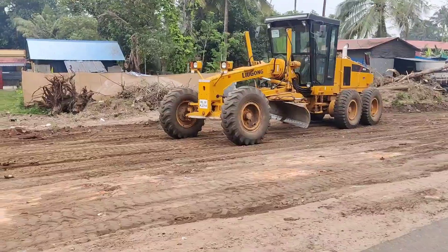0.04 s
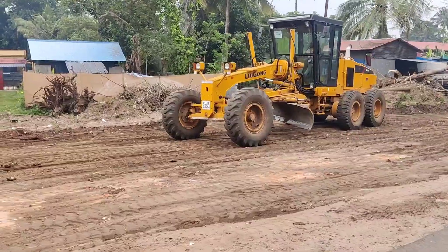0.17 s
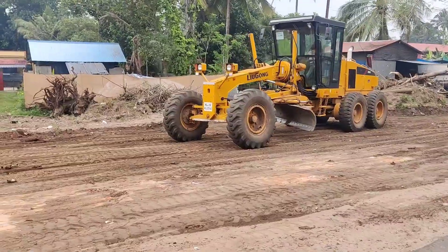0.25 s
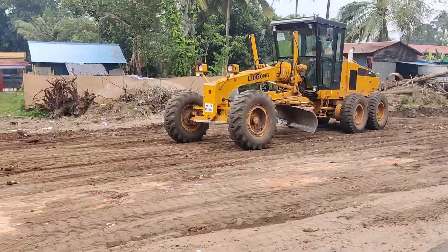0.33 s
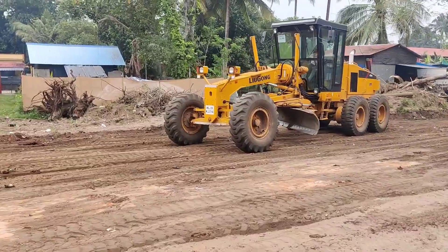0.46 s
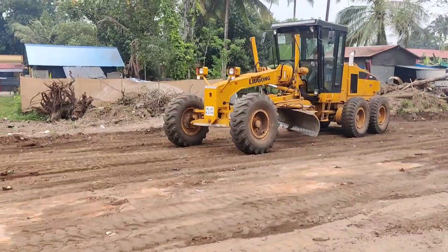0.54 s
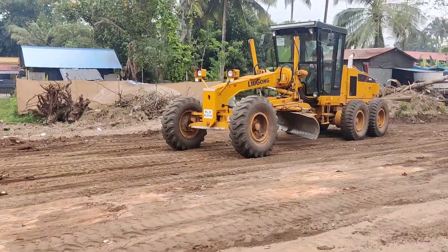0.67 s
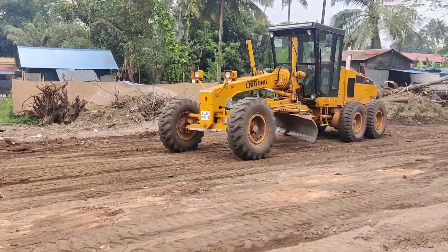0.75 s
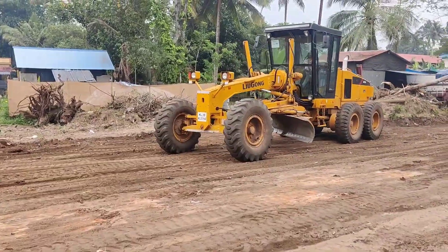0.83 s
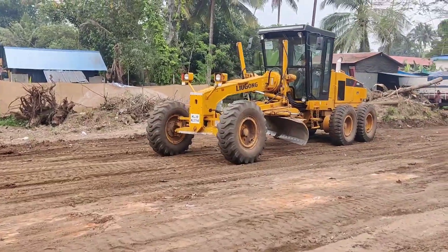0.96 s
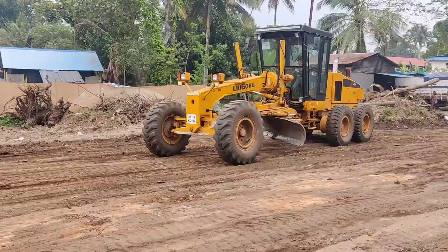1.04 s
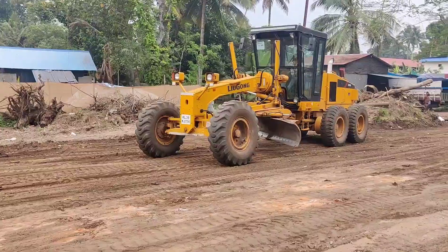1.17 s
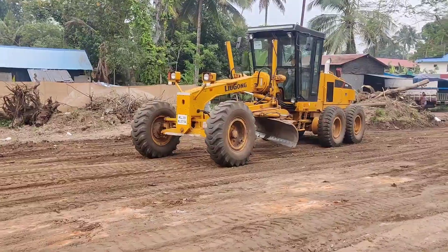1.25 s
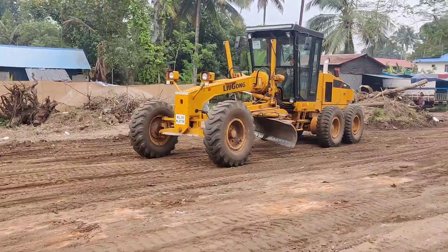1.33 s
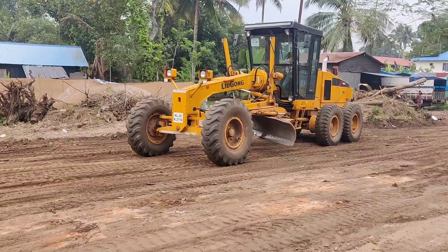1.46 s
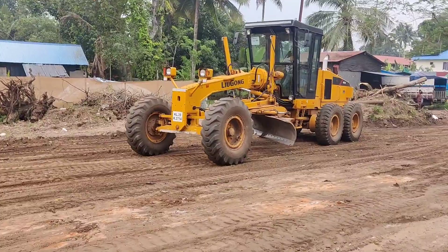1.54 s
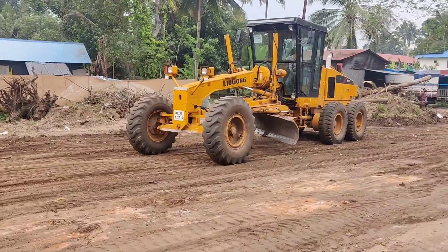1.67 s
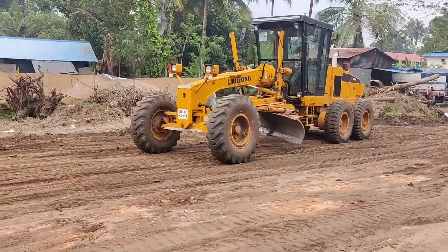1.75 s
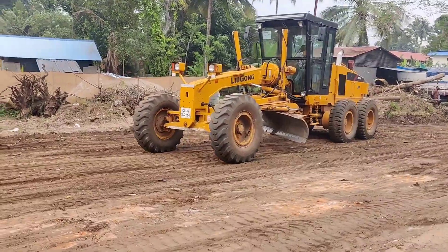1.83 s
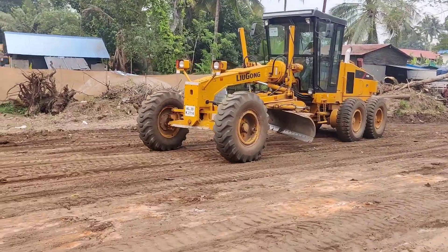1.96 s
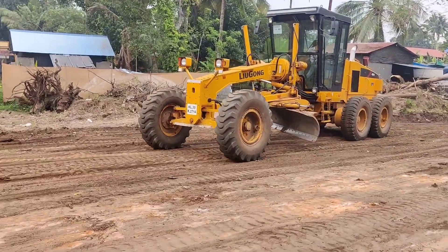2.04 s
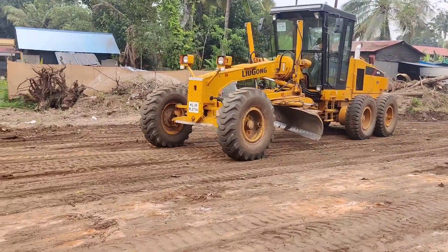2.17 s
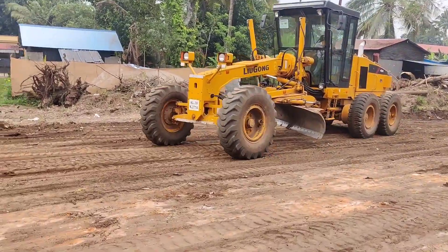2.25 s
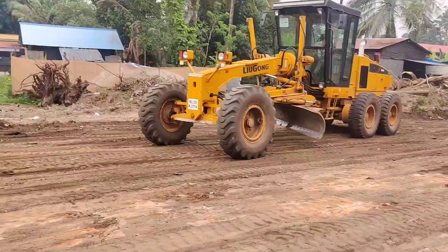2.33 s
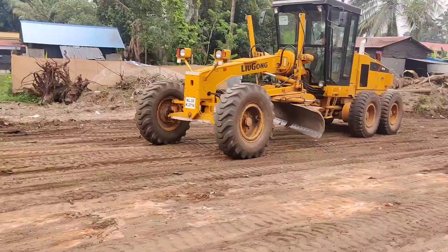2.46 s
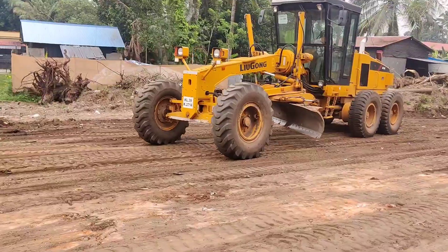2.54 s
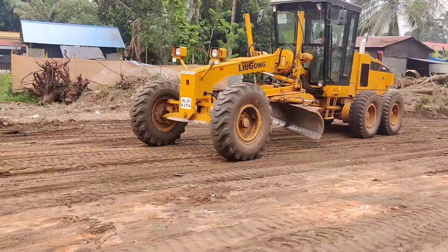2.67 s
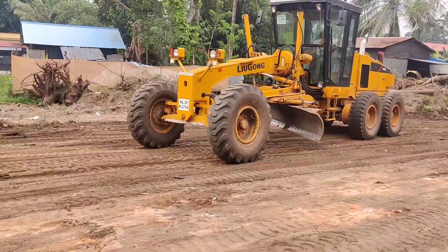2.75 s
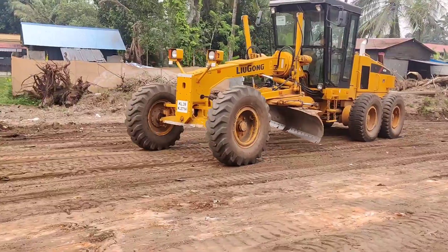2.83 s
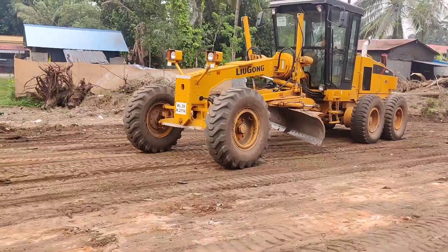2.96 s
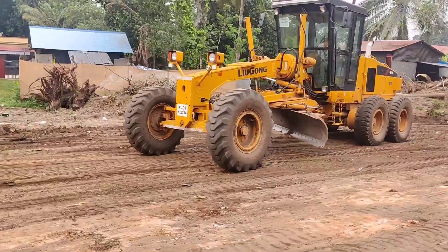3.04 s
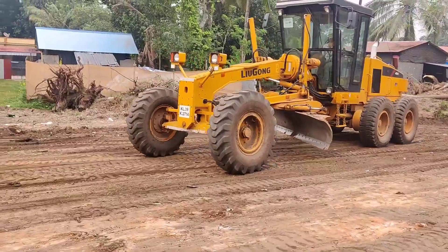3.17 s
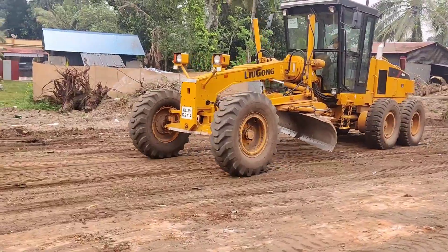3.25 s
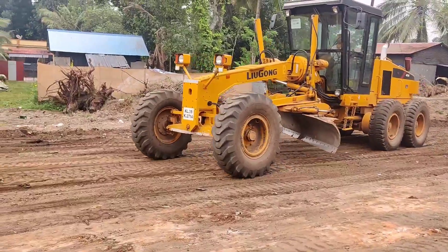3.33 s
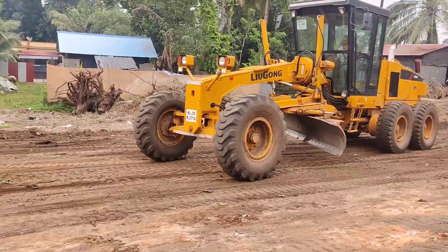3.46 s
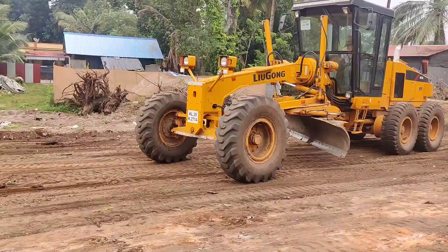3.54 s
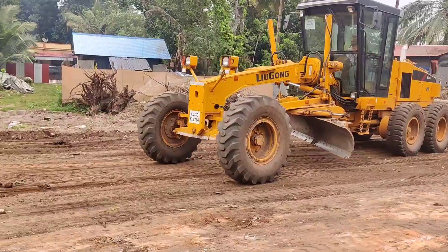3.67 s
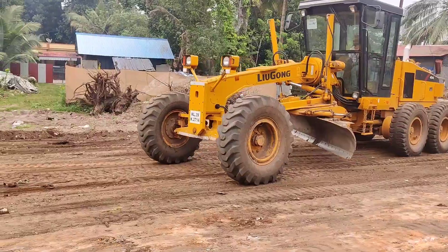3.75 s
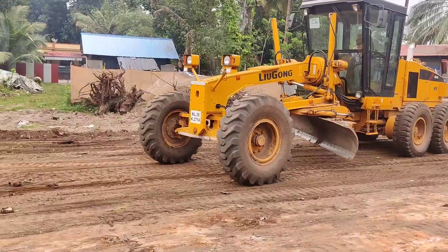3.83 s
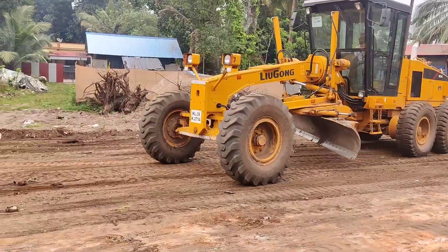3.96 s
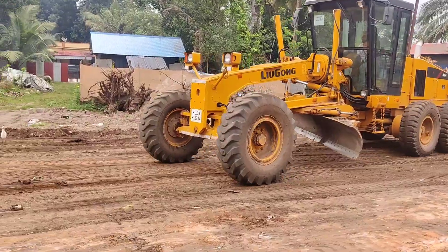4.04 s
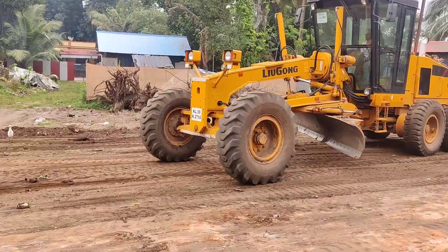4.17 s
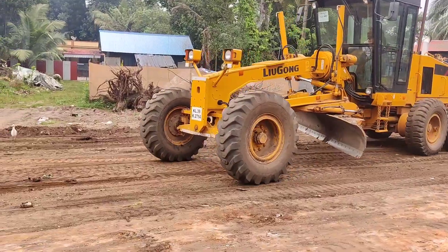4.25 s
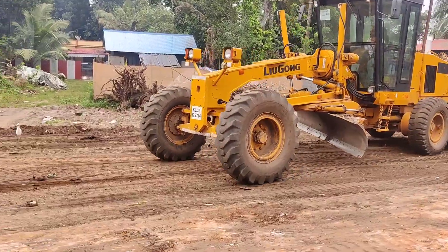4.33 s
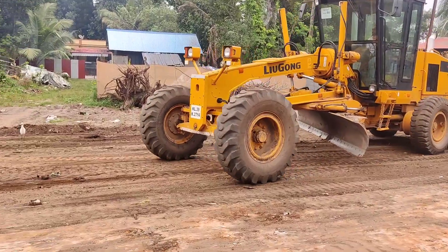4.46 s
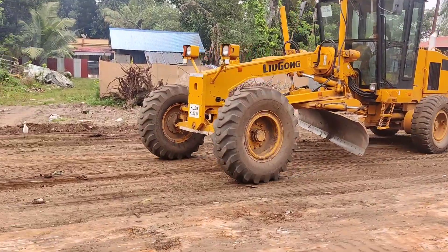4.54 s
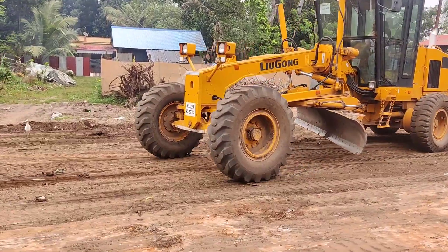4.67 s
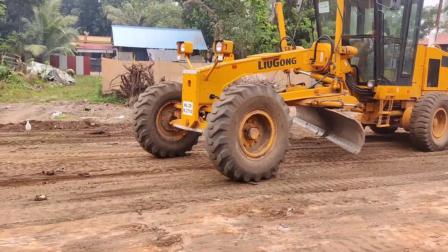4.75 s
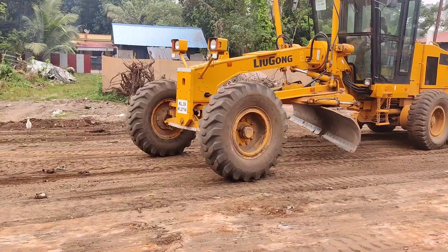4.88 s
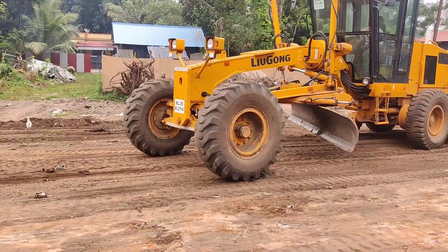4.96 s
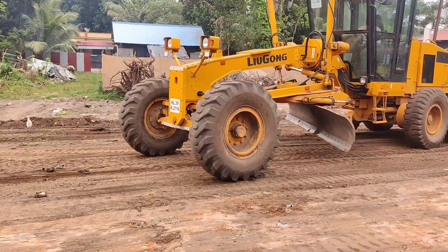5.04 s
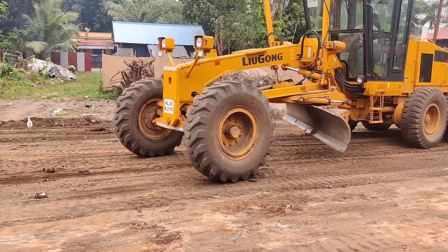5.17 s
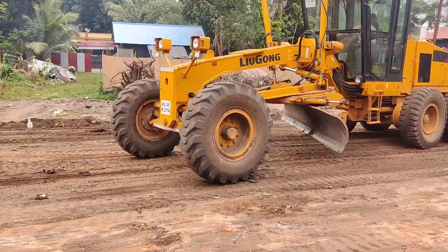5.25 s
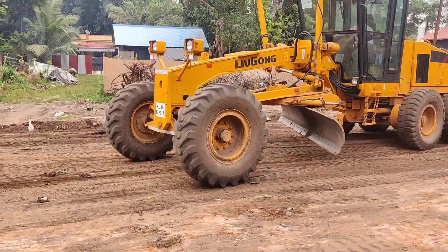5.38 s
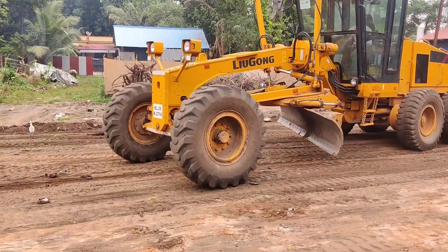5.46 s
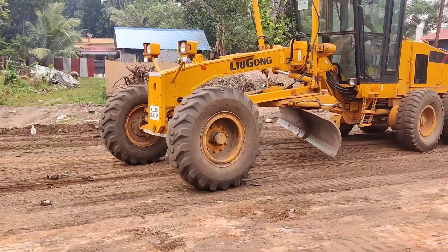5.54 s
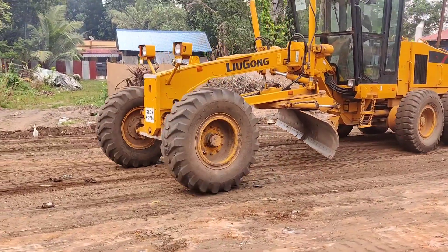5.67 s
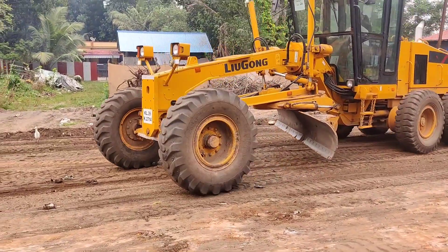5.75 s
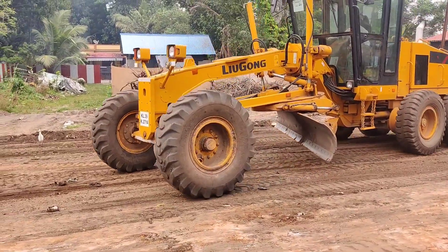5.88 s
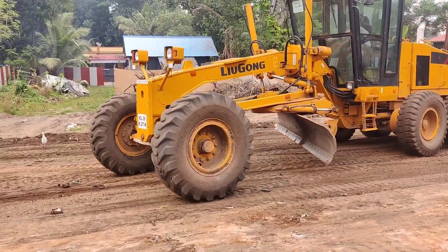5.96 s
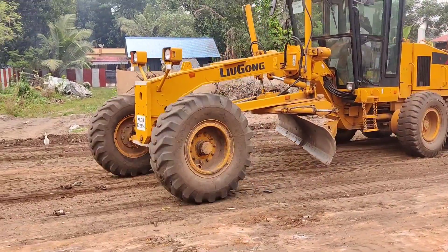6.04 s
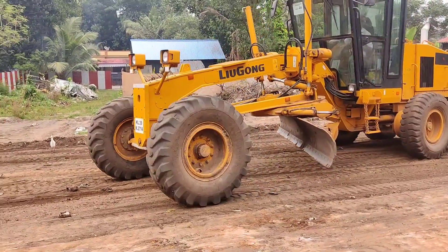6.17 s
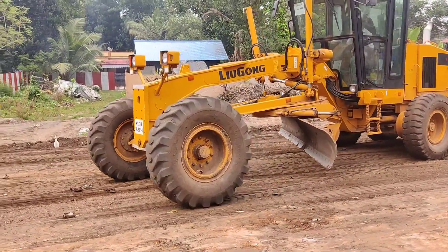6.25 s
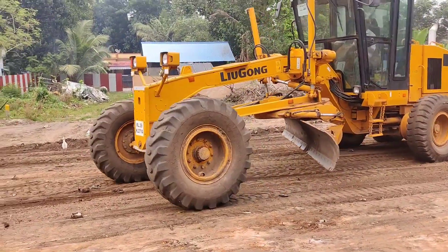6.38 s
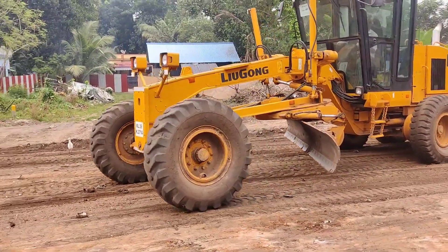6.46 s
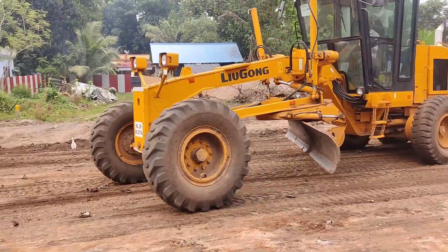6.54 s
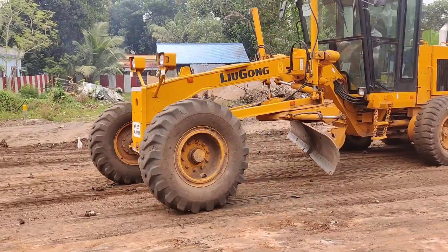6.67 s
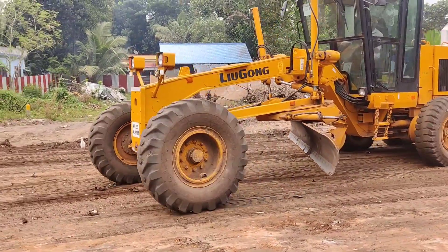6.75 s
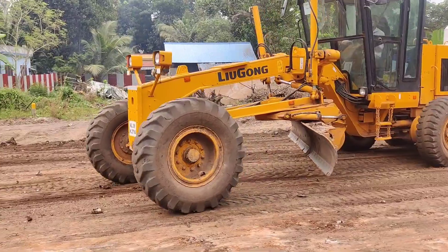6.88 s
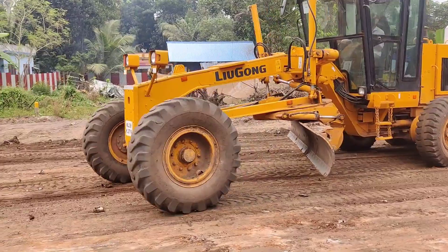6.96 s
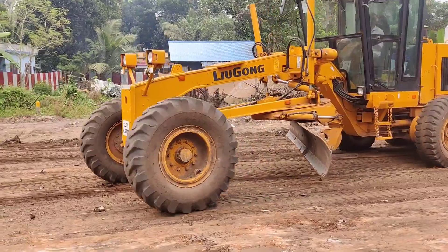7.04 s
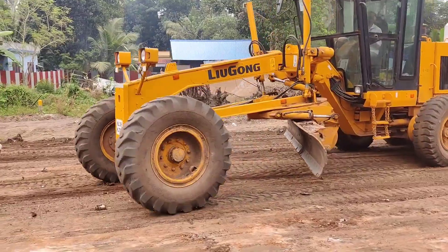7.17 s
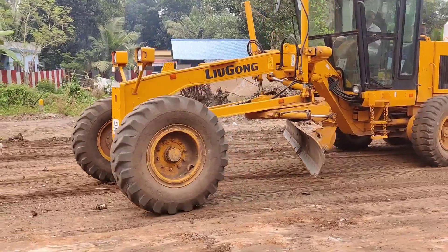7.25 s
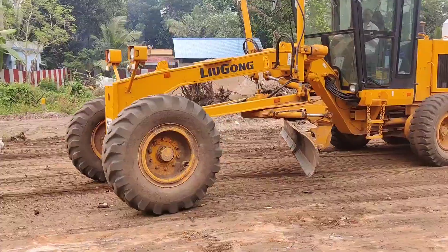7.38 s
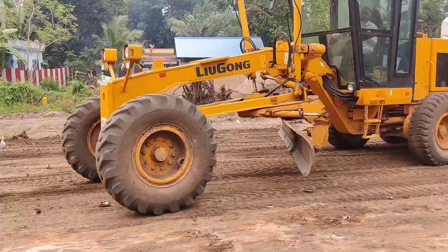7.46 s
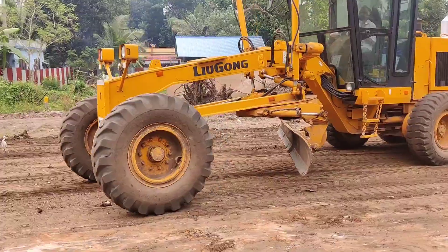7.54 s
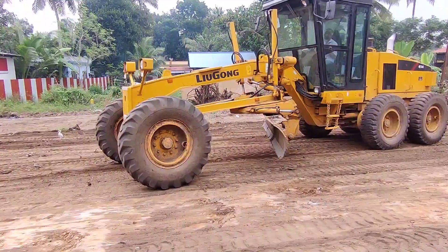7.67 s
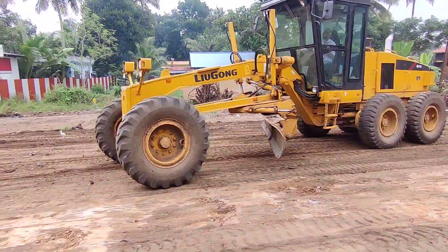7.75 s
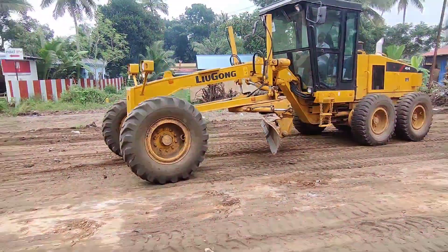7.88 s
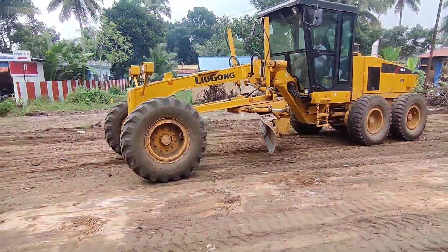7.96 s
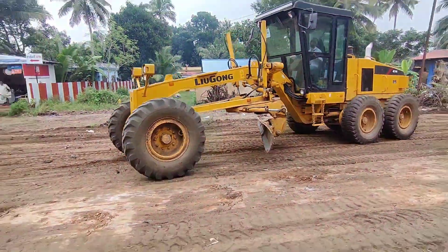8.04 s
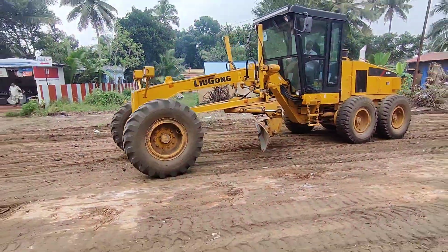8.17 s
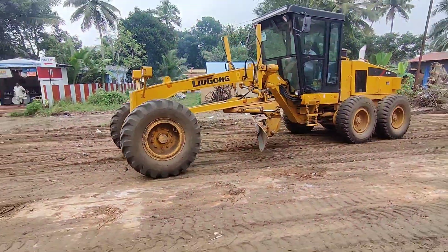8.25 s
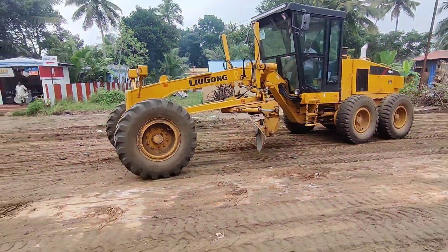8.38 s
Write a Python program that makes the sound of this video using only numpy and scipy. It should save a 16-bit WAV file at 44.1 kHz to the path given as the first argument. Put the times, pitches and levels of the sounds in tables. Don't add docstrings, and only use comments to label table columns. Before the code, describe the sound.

Deep throbbing diesel climbs from idle to a steady droning roar, with a distant horn first, a passing motorbike midway and swelling fan hiss.

```python
import sys
import numpy as np
from scipy import signal
from scipy.io import wavfile
from scipy.ndimage import uniform_filter1d, map_coordinates

SR = 44100
rng = np.random.default_rng(int(sys.argv[2]) if len(sys.argv) > 2 else 0)


def volts_from_decibels(level):
    exponent = np.asarray(level, float) / 20
    return 10 ** exponent


def master(y):
    cut = np.clip(np.atleast_2d(y).T, -1, 1)
    pcm = np.round(cut * 32767)
    wavfile.write(sys.argv[1], SR, pcm.astype(np.int16))


N = 370881
FRAME = 1024
HZ = np.fft.rfftfreq(FRAME, 1 / SR)[:, None]

# time in seconds, firing rate in Hz.
SPEED = [(0.0, 29.8), (0.35, 32.0), (0.51, 32.6), (1.03, 31.1), (1.29, 32.4), (1.54, 42.2), (1.75, 48.4),
         (1.95, 53), (2.2, 56.1), (2.55, 57), (2.97, 60.7), (4.4, 63.4), (5.33, 61.8), (5.8, 62.5),
         (6.3, 62.3), (6.9, 63.7), (7.58, 69.2), (8.41, 68.3)]
# time in seconds, firing tone in dB.
FIRING = [(0, -22.5), (.35, -20.5), (.5, -25), (.8, -21.5), (1.05, -22), (1.22, -19.5), (1.47, -21.5),
          (1.71, -15.5), (1.96, -13), (2.76, -13.5), (3.28, -12), (4.19, -13), (6.47, -12), (6.98, -14.5),
          (7.24, -12.5), (8.41, -14)]
# time in seconds, loss in dB, half length in seconds.
STUMBLES = [
    (.89, 11, 0.034),
    (1.12, 3, 0.037),
    (1.36, 8.5, 0.059),
    (1.83, 2.5, 0.042),
    (2.42, 9, 0.014),
    (2.58, 3.5, 0.034),
]
# frequency in Hz, level in dB.
MUFFLER = [(10, -56), (30, -41.5), (55, -39.5), (75, -41.5), (110, -70), (180, -44), (260, -48),
           (400, -56.5), (700, -69.5)]
# multiple of the firing rate, level in dB.
HARMONICS = [(3, 0.4), (4, -1.66), (5, -13), (6, -14), (7, -20), (8, -12)]
# frequency in Hz, level in dB.
PIPE = [(90, -19), (150, -27), (178, -19.5), (190, -25.5), (208, -21), (245, -18), (260, -21.5), (268, -23),
        (278, -22), (330, -23)]
# firing rate in Hz, lead in dB.
LEAD = [(30, -26), (33, -5), (40, 9), (47, 11.5), (54, 23.5), (62, 23), (65, 19), (69, 16)]
# firing rate in Hz, turn in radians.
MUFFLER_TURN = [(40, -4.5), (48, -4.1), (57, -2.1), (62, -.65), (65, -.2), (69, .8)]
# firing rate in Hz, level in dB.
ROCKING = [(45, -50), (57, -44), (63, -40), (66, -41), (69, -34)]
# frequency in Hz, level in dB per Hz.
INTAKE = [(400, -120), (620, -14), (740, -6), (830, 4), (900, 1), (960, -14), (1100, -27), (1310, -1),
          (1500, -120)]
RUN_UP_S, RUN_UP_HALF_S = 1.736, 0.32
INTAKE_DB, RASP_DB = -39, 15
PULSE_LEAN = -1.0
PIPE_RIGHT_DB, PIPE_CENTRES_S, PIPE_STAYS_DB = 0.5, 3, 0.08

# time in seconds, fan and valve hiss in dB, left lag in ms.
APPROACH = [(0, -35, -0.31), (.6, -36.5, -.3), (1.2, -36.5, -.36), (2, -36.5, -.04), (3.6, -37.5, .02),
            (4.3, -34.5, 0.1), (4.8, -32.5, 0.045), (5.6, -32.5, .02), (6.5, -32, .02), (6.85, -29, .07),
            (7.15, -27, .06), (7.4, -27.5, 0.036), (7.75, -25.5, .06), (8, -26, 0.071), (8.41, -26.5, .06)]
# frequency in Hz, level in dB per Hz.
RUMBLE_IDLE = [(15, -34), (30, -14), (60, -3.5), (100, -10), (150, -9.5), (250, -8.5), (320, -10.5),
               (450, -24), (600, -39), (900, -85)]
# frequency in Hz, level in dB per Hz.
RUMBLE = [(15, -37), (30, -7), (60, -2), (100, -6), (150, -5), (250, -11.5), (320, -11.5), (450, -19),
          (600, -45), (900, -88)]
# frequency in Hz, level in dB per Hz.
BLOCK = [(240, -7), (400, -4), (512, 0.5), (623, -1), (836, -1), (958, -3), (1060, 0.5), (1210, -3.5),
         (1310, -1.5), (1900, -13), (2470, -33.5), (4180, -120)]
# frequency in Hz, level in dB per Hz.
HISS_FAR = [(940, -43), (1600, -3), (2130, 1), (2500, 0), (3070, -4), (3770, -6.5), (5110, -6.5),
            (5930, -7), (6530, -11.5), (7060, -15), (7290, -39), (7480, -42.5), (9720, -64), (16500, -120)]
# frequency in Hz, level in dB per Hz.
HISS_NEAR = [(940, -33), (1600, -1.5), (1930, -3.5), (2300, -2.5), (2530, -4), (2880, -3), (3400, -11.5),
             (4030, -6.5), (5380, -8.5), (5890, -7), (6830, -14), (7480, -13), (9720, -61), (16500, -120)]
# frequency in Hz, level in dB per Hz.
TOP = [(7000, -59.5), (7500, 4), (7900, -14), (8400, -9), (8900, -11.5), (9800, -9), (11500, -12.5),
       (13000, -14), (14500, -16.5), (15300, -16.5), (15600, -71)]
# frequency in Hz, left minus right in dB.
TILT_FAR = [(60, -6), (93, 2.5), (140, -3.5), (220, -1), (340, 0.5), (520, -2), (810, 2), (1240, -3.5),
            (1920, -4.5), (2960, -9), (4560, -2), (7030, -7.5)]
# frequency in Hz, left minus right in dB.
TILT_NEAR = [(60, -4), (87, 2.5), (120, 4.5), (180, -4.5), (260, 0), (370, -2), (540, -1.5), (780, 1),
             (1130, -0.5), (1620, 2.5), (2340, -4), (3380, -7.5), (4870, -2), (7030, -5)]
# frequency in Hz, likeness from 0 to 1.
ALIKE = [(30, .97), (60, .998), (130, 0.93), (230, .97), (460, 0.8), (700, .66), (900, 0.5), (1300, .45),
         (1650, 0.46), (2300, 0.4), (3500, 0.35), (7000, 0.22)]
# frequency in Hz, radians left leads.
TWIST = [(300, 0), (550, -1), (900, -1), (1250, -0.9), (1650, -3), (2000, -2.5)]
# frequency in Hz, level in dB per Hz.
STRAIN = [(150, -48), (205, -9), (240, -3), (300, -7), (400, -36), (720, -25.5), (790, -12), (860, -12),
          (930, -32), (1220, -36), (1300, -14.5), (1380, -38.5), (1800, -76)]
# time in seconds, strain in dB, half length in seconds.
SURGES = [
    (1.7, -35, 0.34),
    (3.805, -49, 0.18),
    (7.7, -38, 0.56),
]
# frequency in Hz, level in dB per Hz.
RATTLE = [(600, -120), (950, -6.5), (1080, 9), (1200, -2.5), (1320, 7), (1450, -21), (2000, -120)]
# frequency in Hz, level in dB per Hz.
FAN_RING = [(1500, -120), (2150, -6.5), (2330, 0), (2480, -12), (3500, -120)]
# time in seconds, level in dB, half length in seconds.
FAN_RINGS = [
    (7.1, -36, .3),
    (7.75, -33, .4),
]
RATTLE_S, RATTLE_DB, RATTLE_HALF_S = 3.1, -38.5, 1.4
STRAIN_REST_DB = -50
FAR_DB, NEAR_DB = -36.5, -28
BLOCK_DB, BLOCK_REVS_DB, BLOCK_GROWS = -34.5, 2, 0.6
RUMBLE_DB, RUMBLE_REVS_DB, RUMBLE_GROWS = -32.5, 3, .45
TOP_DB, TOP_GROWS = -69, 1.44
DIP_HZ, DIP_CLIMB_HZ_PER_S, DIP_TOP_HZ = 440, 80, 820
DIP_DB, DEEPEST_DB, DEEPEST_S, DEEP_FOR_S = 3.5, 3.5, 4.03, 0.86

# time in seconds, level in dB.
HORN = [
    (0, -41.5),
    (.12, -40.5),
    (.2, -38.5),
    (.3, -37),
    (.42, -40.5),
    (.5, -47),
    (.65, -96),
]
# frequency in Hz, level in dB.
HORN_LINES = [(1814, -44.5), (2562, -52), (2929, -40), (3025, -46), (3295, -45), (3334, -45.5),
              (4393, -55.5)]
# frequency in Hz, level in dB per Hz.
BLARE = [(1500, -59), (1800, -5.5), (2200, -15.5), (2800, -11), (3000, -1), (3350, -3), (3550, -11.5),
         (4500, -41.5), (5500, -70)]

# frequency in Hz, level in dB per Hz.
BUFFET = [(12, -11.5), (25, -6), (40, -0.5), (60, -11), (150, -14.5), (300, -29), (600, -79)]

# time in seconds, peak in dB, pitch in Hz, time to fall by 60 dB in seconds.
THUMPS = [
    (0.294, -21.5, 152, 0.17),
    (0.824, -26.5, 148, 0.1),
    (0.836, -28, 255, 0.05),
    (0.846, -31, 190, 0.06),
    (1.149, -29.5, 143, 0.1),
    (1.158, -33, 240, .05),
    (2.44, -34, 110, 0.12),
]
# time in seconds, level in dB, left minus right in dB, length in seconds.
PUFFS = [
    (1.792, -37.5, -9, 0.034),
    (2.572, -44, -6, 0.031),
    (3.294, -36.5, -1, 0.082),
    (3.986, -39, -13, 0.012),
    (4.825, -37, 2, 0.044),
    (6.413, -43.5, -10, 0.045),
]
PUFF_TOP_DB, JOLT_DB = -25.5, -3

# time in seconds, level in dB, half length in seconds.
SQUEAKS = [
    (.46, -72, .05),
    (.8, -66, .05),
]
# frequency in Hz, level in dB per Hz.
SQUEAK = [(12000, -60), (12600, -4), (12950, 0), (13300, -6), (13900, -62)]

# time in seconds, firing rate in Hz, level in dB.
LORRY = [
    (1.2, 66.8, -60),
    (1.45, 68.7, -40),
    (1.9, 67.8, -43),
    (2.2, 67.5, -25),
    (2.5, 64.1, -28),
    (2.75, 67.6, -38),
    (3.1, 67, -60),
]

# time in seconds, level in dB.
TICKS = [
    (1.7938, -30),
    (2.5656, -29),
    (3.3328, -26),
    (3.9978, -30),
    (6.41, -29),
    (7.8111, -25),
]
# frequency in Hz, level in dB per Hz.
TICK = [(500, -40), (1000, 0), (1400, 0), (2500, -4), (4500, -6), (6800, -12), (7300, -60)]
TICK_HALF_S = .004

# time in seconds, engine cycle in Hz, exhaust in dB, tyre and chain hiss in dB,
# left lag in ms.
BIKE = [
    (3.4, 33.77, -64, -47.5, -.42),
    (4.3, 33.59, -36.5, -36.5, -0.46),
    (4.75, 33.46, -32, -31, -0.433),
    (5.09, 33.6, -24.5, -35, -.1),
    (5.28, 32.0, -26.5, -32.5, 0.3),
    (5.5, 31.74, -30.5, -38, .4),
    (5.68, 31.6, -33, -44, .4),
    (5.9, 31.38, -39, -44, .42),
    (6.5, 31.4, -51, -71, 0.68),
]
# multiple of the engine cycle, level in dB.
BIKE_ORDERS = [(3, -10), (4, -11), (5, 1.5), (6, 0), (9, -11), (10, -12), (13, -22), (15, -23), (18, -18)]
# frequency in Hz, level in dB per Hz.
TYRES = [(500, -30), (900, -8.5), (1500, -16.5), (2900, -0.5), (3600, -3), (6000, 0), (7000, -10),
         (7600, -53.5)]
# frequency in Hz, level in dB per Hz.
CRUNCH = [(150, -120), (300, -14), (450, 0), (900, 3), (1500, 7), (2100, -6), (4000, -28), (7400, -120)]
# frequency in Hz, level in dB per Hz.
CHAIN = [(1800, -57), (2400, -6), (2700, 1), (3100, 3), (3400, -10), (4200, -59)]
CHAIN_S, CHAIN_DB, CHAIN_HALF_S = 4.72, -37, 0.33
CRUNCH_S, CRUNCH_DB, CRUNCH_HALF_S = 5.23, -30.5, 0.17
CRUNCH_TOP_DB, BIKE_TOP_DB = -28, -22.5

# frequency in Hz, level in dB.
EDGE = [(6900, 0), (7150, -10), (7400, -45), (22000, -60)]
# frequency in Hz, share lost from 0 to 1.
DROPS_LEFT = [(1300, 0), (1700, .03), (2400, .01), (3200, .04), (6200, .05), (6600, .3), (7000, .4),
              (7300, .62), (7500, .45), (7900, .65), (8100, .72), (8500, .45), (9200, .3), (15000, .35)]
# frequency in Hz, share lost from 0 to 1.
DROPS_RIGHT = [(1300, 0), (1700, .02), (3200, .02), (6300, .01), (6700, .08), (7000, .25), (7300, .55),
               (7500, .4), (8000, .65), (8500, .4), (9200, .25), (15000, .3)]
# frequency in Hz, extra rounds of dropping.
STARVED = [(7100, 0), (7350, 2.2), (8300, 2.2), (8700, .3), (15000, .3)]
EDGE_WANDER = .018
CEILING = .9


def unit(x):
    return x / np.sqrt(np.mean(x ** 2) + 1e-20)


def along(points, hz):
    f, v = np.transpose(points)
    return np.interp(np.log(hz + 1), np.log(f + 1), v)


def curves(rows, step=1):
    s, *cols = np.transpose(rows)
    now = np.arange(0, N + (step > 1) * FRAME, step) / SR
    return [np.interp(now, s, c) for c in cols]


def wobble(rate):
    knots = rng.standard_normal(int(N * rate / SR) + 4)
    return map_coordinates(knots, [np.arange(N) * rate / SR])


def bumps(rows):
    now = np.arange(N) / SR
    return sum(size * np.exp(-((now - s) / half) ** 2) for s, size, half in rows)


def swells(rows):
    return bumps([(s, volts_from_decibels(db), half) for s, db, half in rows])


def orders(cycle_hz, table, unsteady_db, blur, scatter=7, turn=0):
    phase = 2 * np.pi * np.cumsum(cycle_hz) / SR
    total = 0
    for k, db in table:
        level = np.sqrt(2) * volts_from_decibels(db + unsteady_db * wobble(7))
        offset = (k - 1) * PULSE_LEAN + turn + blur * wobble(5) + scatter * rng.random()
        total = total + level * np.sin(k * phase + offset)
    return total


def rush(colour_db, tilt_db, lag_ms, patchy_db, alike=1):
    frames = N // (FRAME // 2) + 3
    noise = rng.standard_normal((2, (frames - 1) * FRAME // 2))
    a, b = signal.stft(noise, nperseg=FRAME)[2]
    field = uniform_filter1d(rng.standard_normal(a.shape), size=9, axis=0)
    field = uniform_filter1d(field, size=4, axis=1)
    turn = np.arccos(np.clip(along(ALIKE, HZ) ** alike, 0, 1)) / 2
    high = np.clip((HZ - 1900) / 500, 0, 1)
    shift = np.exp(.5j * (1 - high) * along(TWIST, HZ) - 1j * np.pi * high * HZ * lag_ms / 1000)
    mid, side = np.cos(turn) * a, np.sin(turn) * b
    gain = volts_from_decibels(colour_db + patchy_db * unit(field))
    left = (mid + side) * shift * gain * volts_from_decibels(tilt_db / 2)
    right = (mid - side) / shift * gain / volts_from_decibels(tilt_db / 2)
    pair = signal.istft(np.array([left, right]), nperseg=FRAME)[1][:, :N]
    return pair / np.sqrt(np.mean(pair.mean(0) ** 2))


def edge():
    drift = np.interp(np.arange(0, N + FRAME, FRAME // 2), np.arange(N), wobble(18))
    return along(EDGE, HZ * (1 + EDGE_WANDER * drift))


def exhaust():
    hz, = curves(SPEED)
    effort_db, = curves(FIRING)
    tone_db, lead_db = effort_db - bumps(STUMBLES), along(LEAD, hz)
    first = [(1, tone_db + np.minimum(lead_db, 0))]
    second = [(2, tone_db - np.maximum(lead_db, 0))]
    rasp_db = RASP_DB * bumps([(RUN_UP_S - .1, 1, RUN_UP_HALF_S)])
    upper = []
    for k, db in HARMONICS:
        rasp = (4 < k < 8) * np.clip((340 - k * hz) / 40, 0, 1) * rasp_db
        upper.append((k, effort_db + db + along(PIPE, k * hz) + rasp))
    turn = along(MUFFLER_TURN, hz)
    pulse = orders(hz, first, unsteady_db=0.5, blur=.05, scatter=0)
    pulse = pulse + orders(hz, second + upper[:2], unsteady_db=1.1, blur=.15, scatter=0, turn=turn)
    pulse = pulse + orders(hz, upper[2:], unsteady_db=1.5, blur=.25)
    howl = [(k, INTAKE_DB + 1 + along(INTAKE, k * hz)) for k in range(12, 30)]
    run_up = bumps([(RUN_UP_S, 1, RUN_UP_HALF_S)])
    pulse = pulse + run_up * orders(hz, howl, unsteady_db=2.5, blur=.4)
    pulse = pulse + orders(hz, [(1.5, along(ROCKING, hz))], unsteady_db=1.5, blur=.3)
    uneven = [(k / 6, along(MUFFLER, hz * k / 6)) for k in range(1, 30) if k % 6]
    pulse = pulse + volts_from_decibels(1.2 * wobble(4)) * orders(hz, uneven, unsteady_db=2.0, blur=0.5)
    right_db = PIPE_STAYS_DB + PIPE_RIGHT_DB * np.exp(-np.arange(N) / SR / PIPE_CENTRES_S)
    return pulse * volts_from_decibels([-right_db / 2, right_db / 2])


def roar():
    frame_db, lag_ms = curves(APPROACH, step=FRAME // 2)
    near = np.clip((frame_db - FAR_DB) / (NEAR_DB - FAR_DB), 0, 1)
    revs = np.clip(curves(SPEED, step=FRAME // 2)[0] / 30 - 1, 0, 1)
    tilt_db = (1 - near) * along(TILT_FAR, HZ) + near * along(TILT_NEAR, HZ)
    s = np.arange(len(near)) * FRAME / 2 / SR
    dip_hz = np.clip(DIP_HZ + DIP_CLIMB_HZ_PER_S * s, 600, DIP_TOP_HZ)
    dip_db = DIP_DB + DEEPEST_DB * np.exp(-((s - DEEPEST_S) / DEEP_FOR_S) ** 2)
    dip = -dip_db * np.exp(-(np.log(HZ / dip_hz + 1e-9) / 0.31) ** 2)
    hiss_colour = (1 - near) * along(HISS_FAR, HZ) + near * along(HISS_NEAR, HZ) + edge()
    low_colour = (1 - revs) * along(RUMBLE_IDLE, HZ) + revs * along(RUMBLE, HZ)

    def part(colour_db, patchy_db, alike=1):
        return rush(colour_db, tilt_db, lag_ms, patchy_db, alike)

    hz, hiss_db = curves(SPEED)[0], curves(APPROACH)[0]
    fast, gain_db = np.clip(hz / 30 - 1, 0, 1), hiss_db - FAR_DB
    beat = 2 * np.pi * np.cumsum(hz) / SR
    gate = volts_from_decibels(.6 * np.sin(beat) + .45 * np.sin(beat / 2) + .12 * wobble(14))
    low_db = RUMBLE_DB + RUMBLE_REVS_DB * fast + RUMBLE_GROWS * gain_db + .6 * wobble(4)
    low = volts_from_decibels(low_db) * part(low_colour, patchy_db=0.5)
    block_db = BLOCK_DB + BLOCK_REVS_DB * fast + BLOCK_GROWS * gain_db + .2 * wobble(3)
    block = volts_from_decibels(block_db) * part(along(BLOCK, HZ) + dip, patchy_db=1.0, alike=1.15 - 0.18 * near)
    hiss = volts_from_decibels(hiss_db + .25 * wobble(6)) * part(hiss_colour, patchy_db=1.3)
    top_db = TOP_DB + TOP_GROWS * gain_db + 0.73 * wobble(9.3)
    top = volts_from_decibels(top_db) * part(along(TOP, HZ), patchy_db=2.0)
    push = volts_from_decibels(STRAIN_REST_DB) + swells(SURGES)
    strain = push * part(along(STRAIN, HZ), patchy_db=0.5)
    intake = swells([(RUN_UP_S, INTAKE_DB, RUN_UP_HALF_S)]) * part(along(INTAKE, HZ), patchy_db=2.5)
    rattle = swells([(RATTLE_S, RATTLE_DB, RATTLE_HALF_S)]) * part(along(RATTLE, HZ), patchy_db=1.0)
    ring = swells(FAN_RINGS) * part(along(FAN_RING, HZ), patchy_db=1.0)
    return low + top + gate * (block + hiss + ring) + gate ** 3 * (strain + intake + rattle)


def horn():
    level_db, = curves(HORN)
    flutter_db = np.array([[-5], [3]]) + 2 * wobble(45)
    lines = orders(np.ones(N), HORN_LINES, unsteady_db=1.2, blur=0.5) * volts_from_decibels(flutter_db)
    scatter = rush(along(BLARE, HZ), -13.0, -0.46, patchy_db=2.5, alike=0.37)
    return volts_from_decibels(level_db + 39.0) * (lines + volts_from_decibels(-38.5) * scatter)


def buffet():
    return volts_from_decibels(-40.5 + 3.5 * wobble(2)) * rush(along(BUFFET, HZ), 0, 0, patchy_db=3.0, alike=300)


def knocks():
    thumps, t = np.zeros((2, N + SR)), np.arange(SR // 4) / SR
    for s, db, hz, t60 in THUMPS:
        fade = volts_from_decibels(db - 60 * t / np.clip(t60, .05, .25))
        ring = fade * (1 - np.exp(-t / 0.00093)) * np.sin(2 * np.pi * hz * t)
        thumps[:, round(s * SR):][:, :len(t)] += 2.1 * ring
    jolt_rows = [(s + .015, db + JOLT_DB, .025) for s, db, _, _ in THUMPS[1:]]
    jolts = swells(jolt_rows) * rush(along(RUMBLE, HZ), 0, 0, patchy_db=1)
    swell = np.zeros((2, N))
    for s, db, pan_db, length in PUFFS:
        sides = volts_from_decibels(db + np.array([[pan_db / 2], [-pan_db / 2]]))
        swell += sides * bumps([(s + length / 2, 1, length / 2)])
    grit = rush(along(HISS_FAR, HZ) + along(EDGE, HZ), 0, 0, patchy_db=3)
    grit = grit + volts_from_decibels(PUFF_TOP_DB) * rush(along(TOP, HZ), 0, 0, patchy_db=0.5)
    return thumps[:, :N] + jolts + swell * grit


def squeaks():
    return swells(SQUEAKS) * rush(along(SQUEAK, HZ), 0, 0, patchy_db=1)


def lorry():
    hz, level_db = curves(LORRY)
    return orders(hz, [(1, level_db)], unsteady_db=1, blur=.2)


def ticks():
    rows = [(s + TICK_HALF_S, db, TICK_HALF_S) for s, db in TICKS]
    return swells(rows) * rush(along(TICK, HZ), -4, 0, patchy_db=1)


def motorbike():
    hz, exhaust_db, hiss_db, _ = curves(BIKE)
    lag_ms = curves(BIKE, step=FRAME // 2)[3]
    tilt_db = along(TILT_FAR, HZ)
    top = rush(along(TOP, HZ), tilt_db, lag_ms, patchy_db=4.0)
    tyres = rush(along(TYRES, HZ) + edge(), tilt_db, lag_ms, patchy_db=1.2, alike=.5)
    tyres = tyres + volts_from_decibels(BIKE_TOP_DB) * top
    bark = volts_from_decibels(2.6 * wobble(40)) * rush(along(CRUNCH, HZ), tilt_db, lag_ms, patchy_db=-3.0)
    bark = (bark + volts_from_decibels(CRUNCH_TOP_DB) * top) * swells([(CRUNCH_S, CRUNCH_DB, CRUNCH_HALF_S)])
    notes = orders(hz, BIKE_ORDERS, unsteady_db=1.2, blur=0.1)
    chain = rush(along(CHAIN, HZ), tilt_db, lag_ms, patchy_db=3.0)
    chain = chain * swells([(CHAIN_S, CHAIN_DB, CHAIN_HALF_S)])
    return volts_from_decibels(exhaust_db) * notes + bark + chain + volts_from_decibels(hiss_db) * tyres


def scene():
    grader = exhaust() + roar()
    road = horn() + knocks() + squeaks() + lorry() + motorbike()
    return grader + road + buffet() + ticks()


def dropouts(x):
    size, lead = 2 * FRAME, 3 * FRAME - 435
    window = np.sin(np.pi * (np.arange(size) + .5) / size)
    x = np.pad(x, ((0, 0), (lead, lead)), mode="reflect", reflect_type="odd")
    hz, s, z = signal.stft(x, SR, window=window, nperseg=size)
    share = np.array([along(DROPS_LEFT, hz), along(DROPS_RIGHT, hz)])[:, :, None]
    hiss_db = np.interp(s - lead / SR, *np.transpose(APPROACH)[:2])
    far = np.clip((NEAR_DB - 4 - hiss_db) / (NEAR_DB - 4 - FAR_DB), 0, 1)
    share = 1 - (1 - share) ** (1 + along(STARVED, hz)[:, None] * far)
    draws = rng.random((4, len(hz) // 8 + 1, z.shape[2] // 2 + 1))
    draws = draws.repeat(8, axis=1).repeat(2, axis=2)
    both, left, right, pick = draws[:, :len(hz), :z.shape[2]]
    luck = np.where(pick < .75, both, [left, right])
    kept = (luck > share) / (1 - share) ** .3
    return signal.istft(z * kept, SR, window=window, nperseg=size)[1][:, lead:lead + N]


def top_cut(x):
    return signal.sosfilt(signal.butter(12, 15480, fs=SR, output="sos"), x)


def record(dry):
    soft = dry / (1 + (dry / CEILING) ** 4) ** .25
    mix = dropouts(soft)
    return top_cut(mix)


dry = scene()
out = record(dry)
master(out)
```